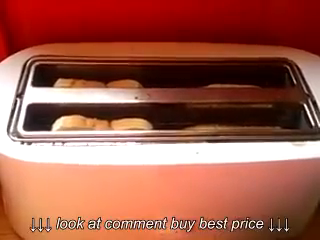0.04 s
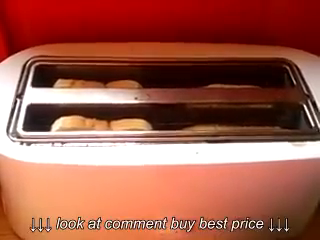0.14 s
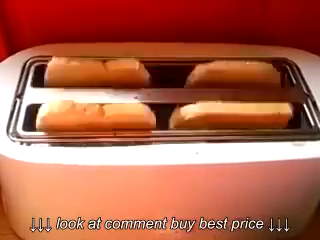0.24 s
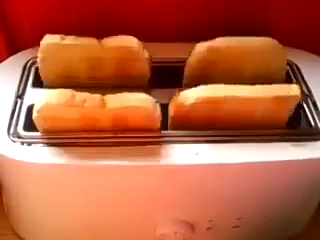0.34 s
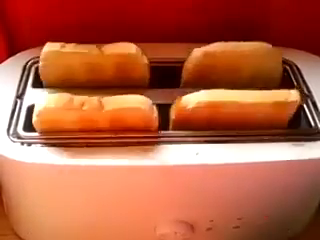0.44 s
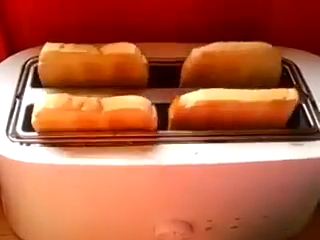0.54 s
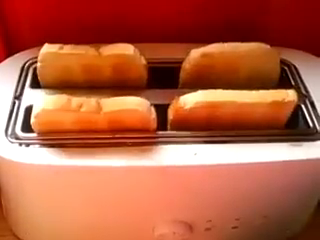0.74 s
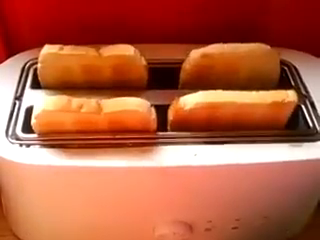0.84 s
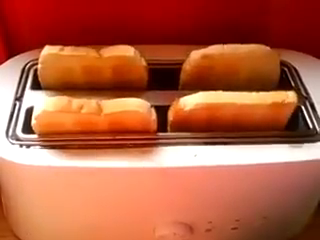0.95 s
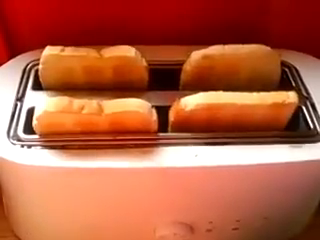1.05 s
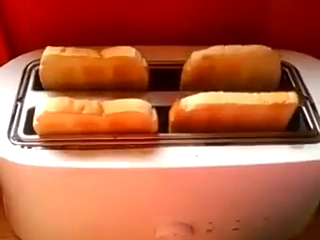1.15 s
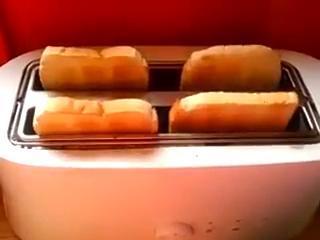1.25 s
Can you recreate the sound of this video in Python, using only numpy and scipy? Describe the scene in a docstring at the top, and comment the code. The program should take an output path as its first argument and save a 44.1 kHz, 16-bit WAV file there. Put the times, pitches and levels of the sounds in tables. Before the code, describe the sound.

A toaster pops up close by in a small, hard-walled room. After faint hiss, the catch snaps free at about 0.25 seconds and the sprung carriage rattles upward. At 0.4 seconds it hits its stop with a hollow clack and bounces, while the toast settles with soft thumps until 0.6 seconds. The metallic ring dies by about 1 second, leaving faint hiss, tiny ticks and a low, fading rumble.

```python
"""A four-slice toaster pops up in a small, hard-walled room, heard in mono from close by.
Over a faint hiss and the ticks of hot metal, the catch creeps, then snaps free and rings the steel frame.
The sprung carriage rattles up its guides, clacks against the top stop and bounces; the casing booms.
The slices jump and drop back with soft thumps. Metal and room ring out, and a dull rumble slowly sinks."""
import sys
import numpy as np
from scipy import signal
from scipy.fft import rfft, irfft
from scipy.io import wavfile

SR = 44100
rng = np.random.default_rng(int(sys.argv[2]) if len(sys.argv) > 2 else 0)


def store_wav(level_fs):
    """Save 16-bit WAV to argv[1]."""
    pcm = np.round(np.clip(np.atleast_2d(level_fs), -1, 1) * 32767)
    wavfile.write(sys.argv[1], SR, pcm.T.astype(np.int16))


N = 57330
TIME = np.arange(N) / SR


def from_db(db):
    """Decibels to gain."""
    return 10 ** (np.asarray(db) / 20)


def rms_one(x):
    """Scale to an rms of 1."""
    return x / np.sqrt(np.mean(x ** 2) + 1e-20)


def decay(t60):
    """An envelope that loses 60 dB in t60 seconds."""
    return np.exp(-np.log(1000) * TIME / t60)


def attack(seconds):
    """An envelope that builds up with the given time constant."""
    return 1 - np.exp(-TIME / seconds)


def noise(spectrum, envelope=1):
    """Noise under an envelope, then a minimum-phase EQ that keeps its level and adds no pre-ring."""
    hz, db = np.transpose(spectrum)
    grid = np.maximum(np.fft.rfftfreq(2 * N, 1 / SR), 1)
    curve = from_db(np.interp(np.log(grid), np.log(hz), db))
    low_cut = 1 / np.sqrt(1 + (hz[0] / grid / 2) ** 4)
    cepstrum = irfft(np.log(rms_one(curve * low_cut)))
    cepstrum[1:N] *= 2
    cepstrum[N + 1:] = 0
    white = rng.standard_normal(N) * envelope
    return irfft(rfft(white, 2 * N) * np.exp(rfft(cepstrum)))[:N]


def excite(force, response):
    """Play a force through a ringing response."""
    return signal.fftconvolve(force, response)[:N]


def clicks(hits):
    """One impulse per contact, from rows of (time [s], level [dB])."""
    force = np.zeros(N)
    for seconds, db in hits:
        force[int(seconds * SR)] += from_db(db)
    return force


def swing(modes):
    """Free vibration: damped sines of alternating polarity."""
    return sum((-1) ** k * from_db(db) * decay(t60) * np.sin(2 * np.pi * hz * TIME)
               for k, (hz, db, t60) in enumerate(modes))


def struck_metal(hits, wash, modes, wash_t60, modes_t60, modes_db):
    """Each blow adds energy to a wash of dense sheet-metal modes and to a few clear ones."""
    energy = clicks(hits) ** 2
    wash_envelope = np.sqrt(np.abs(excite(energy, decay(wash_t60) ** 2)))
    modes_envelope = np.sqrt(np.abs(excite(energy, decay(modes_t60) ** 2)))
    tones = sum(from_db(db) * np.sin(2 * np.pi * (hz * TIME + rng.random())) for hz, db in modes)
    return noise(wash, wash_envelope) + from_db(modes_db) * rms_one(tones) * modes_envelope


# colour of the noise bed: (frequency [Hz], relative density [dB])
HISS_EQ = [(15, -52), (25, -30), (69, -4.5), (103, -5), (237, -13.5), (335, -12.5), (769, -19),
           (927, -23.5), (1030, -20), (1390, -22), (15000, -29)]

def hiss():
    """A faint, steady bed of hiss with a warm low end."""
    return from_db(-55.5) * noise(HISS_EQ)


# colour of the dark tail: (frequency [Hz], relative density [dB])
RUMBLE_EQ = [(30, 3), (90, -5.5), (180, 1), (350, -6.5), (700, -0.5), (1100, -15), (2200, -28), (5000, -28),
             (15000, -44)]

def rumble(start_s=0.33, start_db=-52.5, sink_db_per_s=11):
    """A dull rumble comes up with the pop and slowly sinks."""
    since = TIME - start_s
    return noise(RUMBLE_EQ, (since > 0) * from_db(start_db - sink_db_per_s * since))


# colour of the reverb: (frequency [Hz], relative density [dB])
ROOM_EQ = [(80, 1.5), (500, -1), (2000, -2), (6000, -6), (10000, -4.5), (15000, 1)]

def room(source, wet_db=-12.5):
    """Diffuse reflections off the hard walls build up quickly and die away."""
    tail = noise(ROOM_EQ, decay(0.56) * attack(0.0058))
    return from_db(wet_db) * excite(source, tail / np.linalg.norm(tail))


# thin, bright colour of a tick: (frequency [Hz], relative density [dB])
TICK_EQ = [(1000, -14), (4000, -6), (9000, 0), (15000, 0)]

def cooling_ticks(ticks_per_s=14):
    """The hot metal ticks faintly at random moments as it cools."""
    force = (rng.random(N) < ticks_per_s / SR) * rng.uniform(0.6, 1, N)
    return from_db(-54) * noise(TICK_EQ, excite(force, decay(0.008)))


# colour of the slipping catch: (frequency [Hz], relative density [dB])
CREEP_EQ = [(250, 8.5), (900, 1.5), (2000, -5), (5000, -0.5), (7500, -19), (15000, -30)]

def catch_creep(at_s=0.2146, db=-45):
    """A soft scrape as the catch starts to slip, just before it lets go."""
    envelope = excite(clicks([(at_s, db)]), decay(0.2) * attack(0.0034))
    return noise(CREEP_EQ, envelope)


# carriage and slices bump the casing: (time [s], level [dB])
THUMP_HITS = [(0.300, -40.5), (0.346, -36), (0.382, -38), (0.414, -45), (0.436, -46), (0.475, -38.5),
              (0.512, -43), (0.561, -44)]
# low modes of the casing on the worktop: (frequency [Hz], gain [dB], t60 [s])
THUMP_MODES = [(64.6, -4, .12), (75.5, -11.5, 0.31), (117.2, 6, 0.14), (143, -1.5, 0.1),
               (189.7, -2.5, 0.19), (272.3, 0, 0.21)]

def thumps():
    """Soft bumps set the low modes of the casing swinging and give the pop its weight."""
    return excite(clicks(THUMP_HITS), swing(THUMP_MODES) * attack(0.0036))


# colour of the rattling guides: (frequency [Hz], relative density [dB])
RATTLE_EQ = [(100, -6.5), (250, -1.5), (600, 1), (1500, 2), (3000, -1), (5500, 1), (9000, -9), (15000, -23)]

def carriage_rattle(start_s=0.25, end_s=0.4, contacts_per_s=500, db=-29.5, swell_db=1, spread_db=2):
    """The carriage chatters up its guides: a dense run of small contacts that swells slightly."""
    progress = (TIME - start_s) / (end_s - start_s)
    contacts = rng.random(N) < contacts_per_s / SR
    strength = from_db(spread_db * np.clip(rng.standard_normal(N), -2, 2))
    chatter = rms_one(contacts * strength * rng.choice([-1, 1], N))
    envelope = (progress > 0) * (progress < 1) * from_db(db + swell_db * progress)
    ring = noise(RATTLE_EQ, decay(0.14))
    return excite(chatter * envelope, ring / np.linalg.norm(ring))


# the carriage hits its top stop and bounces: (time [s], level [dB])
STOP_HITS = [(0.4055, -26.5), (0.4200, -27.5), (0.4340, -28), (0.4520, -29), (0.4720, -46)]
# wash of dense modes in carriage and casing: (frequency [Hz], relative density [dB])
CASING_WASH = [(88, -40), (150, 1), (221, -21.5), (248, -5), (450, -4.5), (545, -10), (787, -7), (866, -7),
               (2550, -5.5), (3210, -13), (6060, -11), (8750, -22.5), (15000, -23)]
# their clear partials: (frequency [Hz], relative level [dB])
CASING_MODES = [(253, -46), (390, -49), (457, -44), (629, -45), (809, -37), (1130, -52), (1476, -39),
                (1550, -42), (1591, -54), (2235, -47), (2375, -40.5), (2517, -46), (2606, -39.5),
                (5977, -42.5)]

def casing_ring():
    """Carriage and casing ring with every bounce on the stop."""
    return struck_metal(STOP_HITS, CASING_WASH, CASING_MODES, wash_t60=0.37, modes_t60=0.26, modes_db=-4)


# dull, hard colour of the impact on the stop: (frequency [Hz], relative density [dB])
CLACK_EQ = [(150, -2), (300, -2.5), (800, -1.5), (1600, 0.5), (3300, 4.5), (5000, -23), (8000, -15),
            (15000, -37)]
# boom of the hollow casing: (frequency [Hz], level [dB], t60 [s])
HOLLOW_MODES = [(271, -33, 0.2), (449, -27, 0.12), (615, -18, 0.083)]

def stop_clack(at_s=0.4055, crack_db=-14.5):
    """The carriage slams into its stop and the hollow casing answers."""
    blow = clicks([(at_s, 0)])
    crack = noise(CLACK_EQ, excite(blow, decay(0.025) * attack(0.0015)))
    boom = excite(blow, swing(HOLLOW_MODES) * attack(0.0097))
    return from_db(crack_db) * crack + boom


# blows to the steel frame: (time [s], level [dB])
FRAME_HITS = [(0.2400, -23), (0.2725, -29.5), (0.2915, -23.5), (0.3430, -29), (0.4940, -36.5),
              (0.5260, -50.5)]
# wash of dense modes in the frame: (frequency [Hz], relative density [dB])
FRAME_WASH = [(88, -32), (150, -23), (252, 4), (486, -8.5), (772, -10), (833, -6), (1490, 1.5),
              (1600, -11.5), (1800, 0), (2750, -7), (4460, 4), (6300, -1.5), (15000, -15)]
# its clear partials: (frequency [Hz], relative level [dB])
FRAME_MODES = [(786, -36.5), (1262, -40), (1471, -39), (1808, -38), (2322, -37), (3852, -36.5), (4237, -60),
               (4373, -39), (4422, -39), (4567, -60), (4609, -59), (5396, -43), (7719, -61)]

def frame_ring():
    """Latch and spring strike the steel frame, which jingles again as the slices settle."""
    return struck_metal(FRAME_HITS, FRAME_WASH, FRAME_MODES, wash_t60=0.37, modes_t60=0.46, modes_db=-14.5)


# steel meets steel: (time [s], level [dB])
SNAP_HITS = [(0.242, -22), (0.2715, -26.5), (0.274, -22), (0.4105, -31)]
# bright colour of a snap: (frequency [Hz], relative density [dB])
SNAP_EQ = [(800, -28), (2500, -6), (4400, 5.5), (8000, -6), (15000, -4)]

def steel_snaps(release_s=0.2401, release_db=-12.5):
    """Hard steel contacts give short, bright cracks, sharpest as the latch lets go."""
    release = excite(clicks([(release_s, release_db)]), decay(0.0025))
    contacts = excite(clicks(SNAP_HITS), decay(0.051))
    return noise(SNAP_EQ, release + contacts)


def scene():
    """The toaster and its reverb over the noise bed, the same in both channels."""
    ring = frame_ring() + casing_ring()
    mechanism = catch_creep() + steel_snaps() + carriage_rattle() + stop_clack()
    toaster = ring + mechanism + thumps() + cooling_ticks()
    mono = toaster + room(toaster) + hiss() + rumble()
    return np.array([mono, mono])


def record(dry, cutoff_hz=15100):
    """A steep low-pass takes off the very top."""
    return signal.sosfilt(signal.ellip(12, .1, 70, cutoff_hz, fs=SR, output="sos"), dry)


dry = scene()
out = record(dry)
store_wav(out)
```